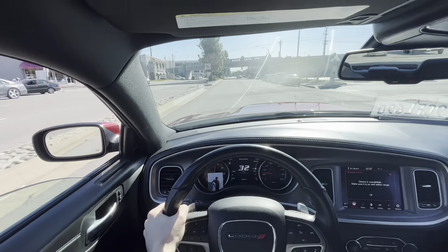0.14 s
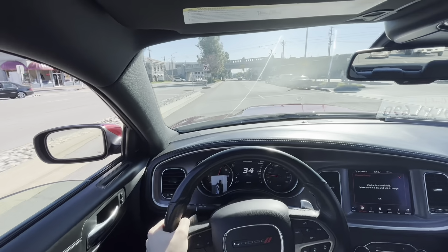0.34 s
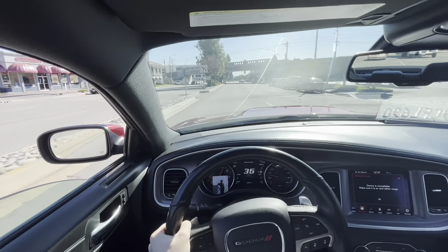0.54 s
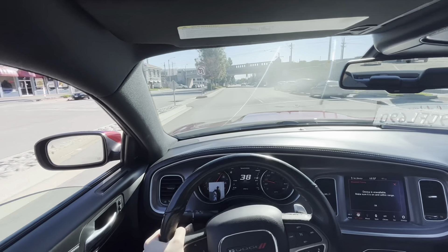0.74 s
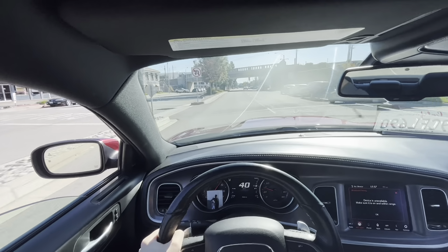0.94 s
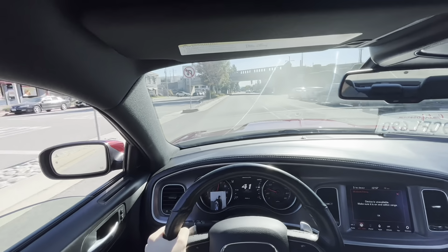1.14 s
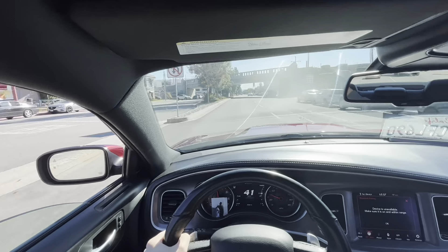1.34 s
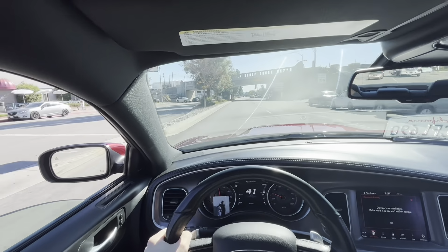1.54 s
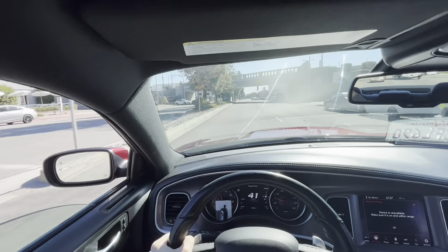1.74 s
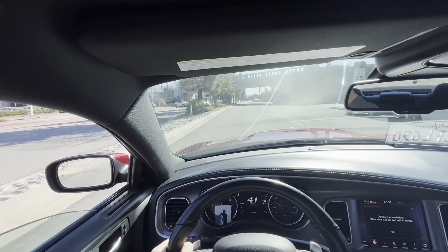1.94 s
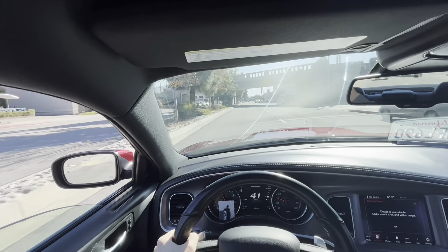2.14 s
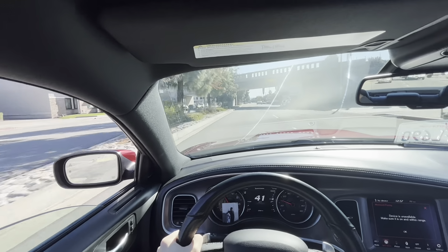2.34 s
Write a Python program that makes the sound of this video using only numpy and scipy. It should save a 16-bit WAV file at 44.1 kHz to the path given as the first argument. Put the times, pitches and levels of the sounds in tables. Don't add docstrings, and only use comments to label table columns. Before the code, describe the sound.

A powerful V8 car engine roars at full throttle inside the cabin, then drops to cruise.

```python
import sys
import numpy as np
from scipy import signal
from scipy.io import wavfile

SR = 44100
rng = np.random.default_rng(int(sys.argv[2]) if len(sys.argv) > 2 else 0)


def transcribe(u):
    v = np.clip(np.atleast_2d(u).T, -1, 1)
    q = np.round(v * 32767).astype(np.int16)
    wavfile.write(sys.argv[1], SR, q)


def nominal_scale(level):
    x = np.asarray(level, float) / 20
    return 10 ** x


N = 105972
TIME_S = np.arange(N) / SR
MID, OPPOSITE = np.array([[1], [1]]), np.array([[1], [-1]])


def in_time(rows):
    times_s, *columns = np.transpose(rows)
    return [np.interp(TIME_S, times_s, column) for column in columns]


def at_hz(points, hz):
    table_hz, level_db = np.transpose(points)
    return np.interp(np.log(hz), np.log(np.maximum(table_hz, 1)), level_db)


def rms_one(x):
    return x / np.sqrt(np.mean(x ** 2) + 1e-20)


def drift(rate_hz):
    hop, settle = 40, 2000
    r = np.exp(-2 * np.pi * rate_hz * hop / SR)
    white = rng.standard_normal(N // hop + settle + 2)
    slow = rms_one(signal.lfilter([1], [1, -2 * r, r * r], white)[settle:])
    return np.interp(np.arange(N) / hop, np.arange(len(slow)), slow)


def band_filter(order, hz, kind, x):
    return signal.sosfilt(signal.butter(order, hz, kind, fs=SR, output="sos"), x)


def resonate(x, modes):
    out = 0
    for k, (hz, width_hz, level_db) in enumerate(modes):
        r = np.exp(-np.pi * width_hz / SR)
        poles = [1, -2 * r * np.cos(2 * np.pi * hz / SR), r * r]
        mode = signal.lfilter([1, 0, -1], poles, x) * (1 - r * r) / 2
        out = out + (-1) ** k * nominal_scale(level_db) * mode
    return out


# frequency_hz [Hz], side_minus_mid_db [dB]
EAR_WIDTH = [(40, -16), (200, -22.5), (390, -19), (560, -3), (1200, -2), (4000, 2.5), (9000, 1)]


def banded_noise(spectrum):
    out, edges_hz = 0, 20 * 2 ** np.arange(0, 9.7, .5)
    flicker_db, flicker_hz = 1.0, 12
    white = rng.standard_normal((2, 2, N))
    for k, (low_hz, high_hz) in enumerate(zip(edges_hz, edges_hz[1:])):
        mid, side = band_filter(2, [low_hz, high_hz], "band", white[k % 2])
        hz = np.sqrt(low_hz * high_hz)
        level_db = at_hz(spectrum, hz) + flicker_db * drift(flicker_hz)
        out = out + nominal_scale(level_db) * (mid + nominal_scale(at_hz(EAR_WIDTH, hz)) * side * OPPOSITE)
    return rms_one(out)


# cycle_multiple [1], level_db [dB]
PULLING_ORDERS = [(1, -43), (2, -15.5), (3, -6), (4, 0), (5, 0.5), (6, -27), (7, -53), (8, -3.5), (9, -1),
                  (10, -20.5), (11, -3), (12, -25), (13, -5.5), (14, -13.5), (15, -31.5), (16, -11.5),
                  (17, -10.5), (18, -11.5), (19, -20.5), (20, -46.5), (21, -18), (22, -24), (23, -26),
                  (24, -30.5), (25, -21), (26, -28), (27, -57.5), (28, -23), (29, -21.5), (30, -27.5)]
# cycle_multiple [1], level_db [dB]
COASTING_ORDERS = [(1, -13), (2, -5.5), (3, 1), (4, -11.5), (5, -2.5), (6, -6), (7, -11.5), (8, -2),
                   (9, -13), (10, -5), (11, -13.5), (12, -22.5), (13, -14), (14, -19.5), (15, -42.5),
                   (16, -20), (17, -22), (18, -39)]
# cycle_multiple [1], cycle_hz [Hz], remainder [0-1]
PATH_CANCELS = [(4, 37.2, .35), (8, 35.5, .2), (9, 35.3, .6), (11, 36.2, .12), (18, 35.4, .1),
                (14, 37.6, .15), (7, 38.3, .1)]
# cycle_multiple [1], cycle_hz [Hz], half_width_hz [Hz]
PIPE_SWELLS = [(13, 35.2, .8), (16, 35.5, .9), (17, 33, 2.2), (21, 35.5, 1.5), (26, 35.5, 1.5),
               (6, 35, 2.5)]


def path_gains(speed):
    cancel_span_hz = 4.5
    gains = {k: np.abs((speed - hz) / cancel_span_hz + 1j * left) for k, hz, left in PATH_CANCELS}
    gains.update({k: np.abs(1 / ((speed - hz) / half_hz + 1j)) for k, hz, half_hz in PIPE_SWELLS})
    return gains


def order_wave(multiple, cycles):
    pipe_phase = 1.1 * multiple ** 2 - 9.6 * multiple + 2.65
    return np.sqrt(2) * np.cos(2 * np.pi * multiple * cycles + pipe_phase)


# centre_s [s], half_length_s [s], cycle_multiple [1], level_db [dB]
TORQUE_CUT_SWELLS = [
    (.945, 0.11, 4, -18.5),
    (1.04, 0.043, 3, -14),
    (1.103, 0.035, 2, -38),
    (1.106, 0.095, 13, -32),
]


def torque_cut(cycles, s):
    out = 0
    for centre_s, half_length_s, multiple, level_db in TORQUE_CUT_SWELLS:
        envelope = np.cos(np.pi / 2 * np.clip((s - centre_s) / half_length_s, -1, 1)) ** 2
        out = out + nominal_scale(level_db) * envelope * order_wave(multiple, cycles)
    return out


# frequency_hz [Hz], width_hz [Hz], level_db [dB]
CABIN_BOOM = [(460, 13.5, -11.5), (600.6, 33, 3.5), (704, 13, 0.5), (775, 14, 7.5), (888, 20, -7.5),
              (1152, 20, 2)]
# frequency_hz [Hz], width_hz [Hz], level_db [dB]
CABIN_ACROSS = [(100, 10, -17.5), (186, 33, -22.), (336, 24, -29), (500, 13, 1.5), (640, 40, -4.5),
                (745, 13, 4.5), (740, 150, -3.5), (880, 21, -9.5), (930, 150, 1)]


def drone(speed, db):
    lead = int(.1 * SR)
    cycles = np.r_[np.arange(-lead, 0) * speed[0] / SR, np.cumsum(speed) / SR]
    speed, db = [np.pad(curve, (lead, 0), "edge") for curve in (speed, db)]
    s = np.arange(-lead, N) / SR
    lift_s, lift_takes_s = 1.02, .12
    coast = np.clip((s - lift_s) / lift_takes_s + .5, 0, 1)
    pull_wander_db, coast_wander_db = .7, 2.0
    wander_db = pull_wander_db + (coast_wander_db - pull_wander_db) * coast
    orders, quiet_db, paths = 0, dict(COASTING_ORDERS), path_gains(speed)
    for k, pull_db in PULLING_ORDERS:
        wander = np.pad(drift(2.9), (lead, 0), "edge") * wander_db
        pulling = nominal_scale(pull_db) * paths.get(k, 1) * (1 - coast)
        coasting = nominal_scale(quiet_db.get(k, -34)) * coast
        orders = orders + (pulling + coasting) * nominal_scale(wander) * order_wave(k, cycles)
    orders = orders * nominal_scale(db)
    swell = torque_cut(cycles, s)
    alike = orders + resonate(orders, CABIN_BOOM) + swell
    crosswise = resonate(orders, CABIN_ACROSS) + nominal_scale(-21.5) * swell
    return (alike * MID + crosswise * OPPOSITE)[:, -N:]


# cycle_share [0-1], level_db [dB]
FIRING_PATTERN = [(.46, 0.), (.6, -7.), (.7, -7.), (.8, -11.), (.96, -11.), (.08, -10.), (.16, -12.),
                  (.36, -13.)]
# frequency_hz [Hz], width_hz [Hz], level_db [dB]
PANEL_MODES = [(1250, 280, -25.5), (1540, 50, -10), (1873, 50, 11.5), (2090, 78, 11.5), (2335, 74, 12.5),
               (2652, 230, 11.5), (2950, 250, 5), (3510, 220, -2), (3570, 510, 3.5), (4280, 230, -6),
               (7700, 740, -24.5), (12700, 940, -37.5)]


def cracks(cycles, db):
    clicks, turns = np.zeros(N), np.arange(int(cycles[-1]))
    jitter, spread_db = .0022, 1.2
    for share, level_db in FIRING_PATTERN:
        firing = turns + share + rng.normal(0, jitter, len(turns))
        at = np.interp(firing, cycles, np.arange(N)).astype(int)
        clicks[at] = nominal_scale(level_db + spread_db * rng.standard_normal(len(turns)))
    tail_s, ear_lag_s = .001, .0001
    decay = signal.lfilter([1], [1, -np.exp(-1 / (tail_s * SR))], clicks)
    tail = decay * rng.standard_normal((2, N))
    both = np.array([clicks, np.roll(clicks, int(ear_lag_s * SR))]) + .12 * tail
    snap = band_filter(2, (1500, 4800), "band", both)
    near_ear_db = .8
    rung = rms_one(resonate(both, PANEL_MODES) + nominal_scale(-8) * snap)
    return nominal_scale(db) * rung * nominal_scale(near_ear_db * OPPOSITE)


# frequency_hz [Hz], density_db [dB per Hz]
ROAR_SPECTRUM = [(30, -10.5), (120, -11.5), (240, -14.5), (600, -10.5), (1300, -21.5), (3500, -38.5),
                 (6000, -50.5), (13000, -56.5)]


def roar(db):
    noise = banded_noise(ROAR_SPECTRUM)
    low = band_filter(2, 1120, "low", noise)
    linger_s, rumble_db = .09, -1.5
    late_db = rumble_db + np.interp(TIME_S - linger_s, TIME_S, db)
    return nominal_scale(db) * (noise - low) + nominal_scale(np.maximum(db, late_db)) * low


# frequency_hz [Hz], density_db [dB per Hz]
ROAD_SPECTRUM = [(20, -22.5), (60, -5.5), (200, -12), (420, -21), (1200, -41.5), (2800, -55.5),
                 (5500, -64.5), (15000, -82)]
# time_s [s], level_db [dB]
ROAD_LEVEL = [
    (0, -35.5),
    (1.05, -24),
    (1.2, -30),
    (1.4, -31.5),
    (1.6, -33),
    (1.9, -32.5),
    (2.1, -28.5),
    (2.4, -32),
]


def road():
    level_db, = in_time(ROAD_LEVEL)
    return nominal_scale(level_db) * banded_noise(ROAD_SPECTRUM)


# time_s [s], cycle_hz [Hz]
ENGINE_SPEED = [(0, 31.44), (.2, 33.6), (.45, 36.07), (.65, 37.6), (.81, 39.2), (.86, 37.23), (.94, 35.22),
                (1, 31.2), (1.04, 28.5), (1.1, 26.3), (1.16, 26), (1.3, 26.4), (1.6, 26.6), (1.8, 26.1),
                (1.95, 25), (2.1, 22), (2.22, 20.9), (2.4, 20.7)]
# time_s [s], drone_db [dB], crack_db [dB]
ENGINE_LOAD = [(0, -18, -30.5), (.12, -16.5, -32), (.45, -16.5, -35.5), (.8, -18.5, -37), (.91, -18.5, -32),
               (.95, -20, -35.5), (.97, -23, -40.5), (1.0, -22, -36.5), (1.03, -27, -44.5),
               (1.065, -28, -54.5), (1.11, -26.5, -64), (1.17, -34, -53), (1.3, -34, -65),
               (1.6, -31.5, -77), (1.88, -30, -60), (2.03, -31, -59), (2.2, -33, -63), (2.4, -35, -61.5)]


def scene():
    speed, = in_time(ENGINE_SPEED)
    drone_db, crack_db = in_time(ENGINE_LOAD)
    roar_db = 10 + crack_db + .3 * (drone_db - drone_db[0])
    hushed_db = crack_db - 8 * (TIME_S > 1.12)
    firing = cracks(np.cumsum(speed) / SR, hushed_db)
    return drone(speed, drone_db) + firing + roar(roar_db) + road()


def band_limit(x):
    return signal.sosfilt(signal.butter(12, 15720, fs=SR, output="sos"), x)


# low_hz [Hz], high_hz [Hz]
TREBLE_GAPS = [(9600, 11000), (13800, 15650)]


def record(dry):
    fade_s = .004
    mix = dry * np.minimum(1, .25 + np.arange(N)[::-1] / (fade_s * SR))
    for band_hz in TREBLE_GAPS:
        mix = band_filter(5, band_hz, "bandstop", mix)
    return band_limit(mix)


dry = scene()
out = record(dry)
transcribe(out)
```